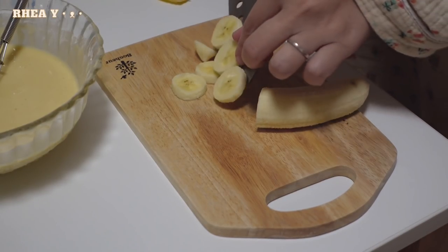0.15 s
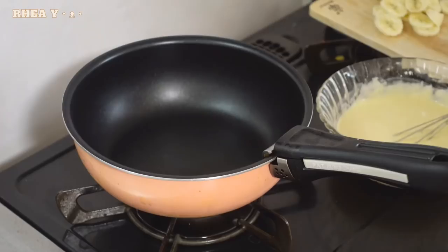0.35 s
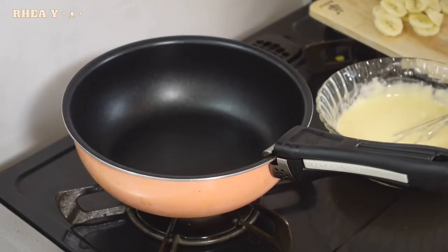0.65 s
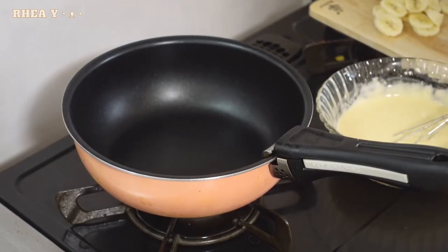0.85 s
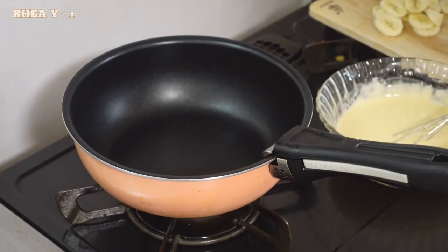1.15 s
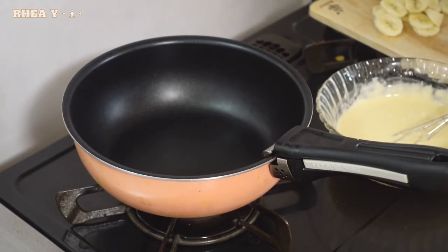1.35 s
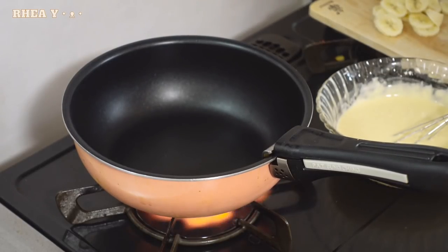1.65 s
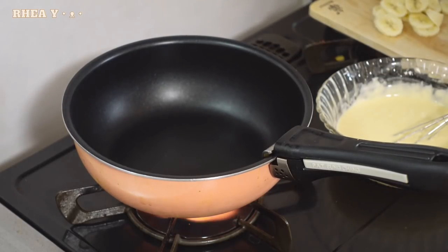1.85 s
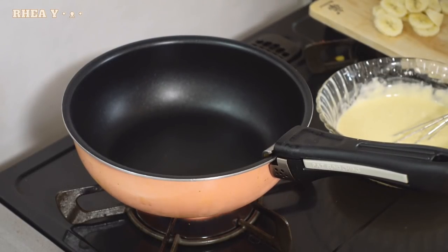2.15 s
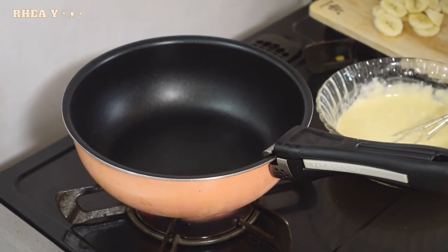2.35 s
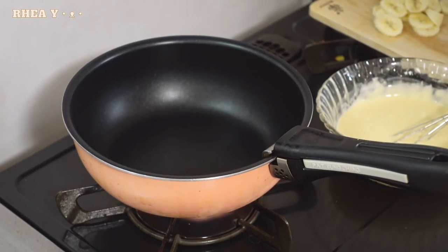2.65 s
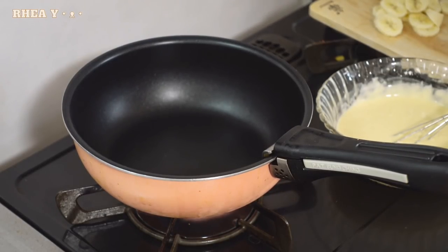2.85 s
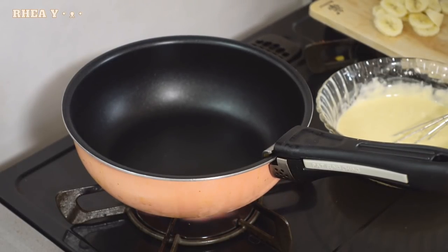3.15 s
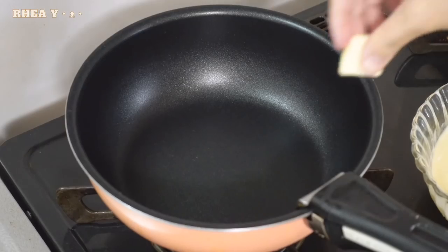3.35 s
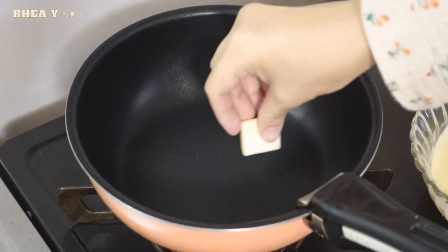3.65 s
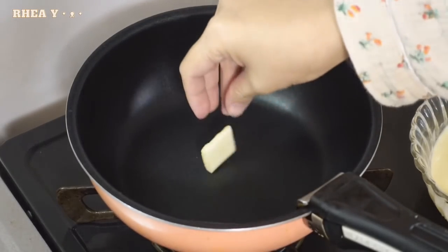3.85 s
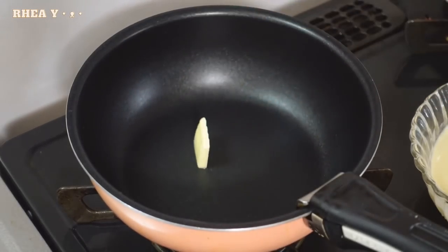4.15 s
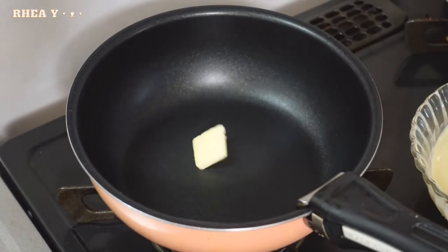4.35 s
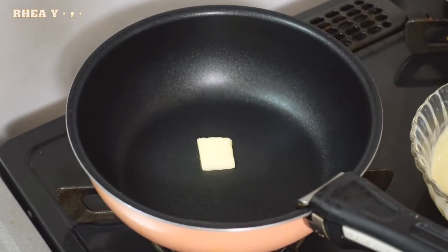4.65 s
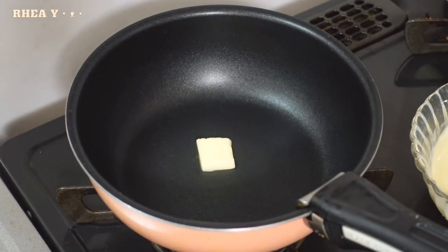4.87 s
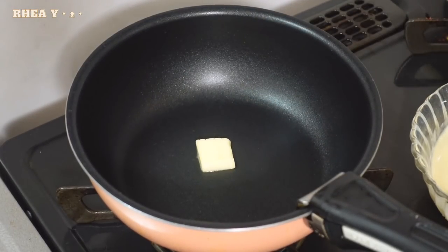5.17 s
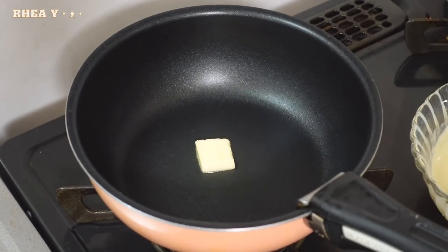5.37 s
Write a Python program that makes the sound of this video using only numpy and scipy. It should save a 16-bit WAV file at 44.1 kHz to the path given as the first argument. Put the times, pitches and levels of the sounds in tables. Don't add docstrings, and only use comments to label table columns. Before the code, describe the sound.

A brief quiet worktop hum cuts to a gas stove: dull knob knocks on sheet metal, a bright valve snap, then sharp sparks about seven a second. Gas catches with a low whump and flutters softly beneath the clicking. After a second cut, a sleeve swishes, a butter pat taps on edge and slaps flat in the pan, with tiny metal ticks and barely audible sizzle. Close microphone, small kitchen.

```python
import sys
import numpy as np
from scipy import signal
from scipy.fft import rfft, irfft, next_fast_len
from scipy.io import wavfile
from scipy.ndimage import uniform_filter1d

SR = 44100
rng = np.random.default_rng(int(sys.argv[2]) if len(sys.argv) > 2 else 0)


def field_ratio(decibels):
    return 10 ** (np.asarray(decibels, dtype=float) / 20)


def digitize_waveform(pressure):
    field = np.atleast_2d(pressure).T
    bounded = np.clip(field, -1, 1)
    quanta = np.round(bounded * 32767).astype(np.int16)
    wavfile.write(sys.argv[1], SR, quanta)


N = 242991

CUTS = [
    0.327,
    3.1625,
]

# f/Hz, spectral level/dB per Hz
WORKTOP_AIR = [(18, -12), (30, -2), (75, -2), (141, -15), (227, -6), (259, -6.5), (486, -12), (1320, -20),
               (1590, -18.5), (3770, -29.5), (10200, -34), (13300, -35), (16000, -37)]
STOVE_AIR = [(18, -45.5), (30, -27.5), (75, -6.5), (161, -5.5), (252, -17.5), (303, -8), (364, -26),
             (1100, -22.5), (1280, -23.5), (7270, -38.5), (13500, -69), (16000, -64)]
PAN_AIR = [(18, -25), (30, -21), (75, -18), (124, -10.5), (170, -16), (287, -12.5), (473, -27.5),
           (666, -19.5), (721, -25.5), (1390, -30), (1720, -28.5), (2540, -32.5), (6800, -42.5),
           (8100, -38.5), (9500, -46), (15500, -47), (15900, -65.5)]
WORKTOP_AIR_DB, STOVE_AIR_DB, PAN_AIR_DB = -63.5, -61, -56
# f/Hz, level/dB
HUM = [(212, -76.5), (1780, -76.5), (2600, -85), (4720, -83.5)]

CALM_DB = [-64.5, -65, -54]
# t/s, level/dB, hold/s
GUSTS = [(0.4, -41.5, 0.27), (.75, -47, 0.3), (1.2, -47.5, 0.033), (1.52, -42.5, 0.022), (1.7, -59, 0.23),
         (3.17, -32.5, 0.27), (3.66, -41, 0.012), (3.83, -41.5, 0.024), (4.1, -45.5, 0.17),
         (4.61, -39.5, 0.019), (4.8, -44, 0.36), (5.25, -50.5, 0.18)]
GUST_RISE_DB_S, GUST_FALL_DB_S = 106.5, 115

# t/s, peak level/dB, ring f/Hz, top f/Hz
TICKS = [(0.061, -48.5, 9400, 14000), (3.6032, -39.5, 8060, 8000), (3.6745, -36, 5440, 7000),
         (3.713, -45, 4770, 9000), (3.758, -55, 4290, 7000), (3.78, -45, 8200, 8060),
         (3.902, -34.5, 5460, 7060), (4.2828, -27.5, 8260, 11800), (4.5514, -46.5, 4000, 6950),
         (4.569, -40, 3600, 5000), (4.776, -50, 7960, 9000), (4.997, -42.5, 5930, 6500),
         (5.155, -37, 5200, 6000), (4.6927, -38.5, 8500, 15000), (4.7074, -42.5, 8700, 14100),
         (4.785, -42, 7870, 10100), (4.991, -35.5, 5300, 7040), (5.047, -42, 4770, 8000),
         (5.148, -35.5, 4400, 7000), (5.2924, -40, 4470, 7000), (5.491, -38.5, 8640, 11960)]

# t/s, level/dB, hold/s, brightness/dB
SLEEVE_MOVES = [(0.331, -65, .03, -8.5), (0.416, -58, 0.021, -9.5), (0.517, -65, 0.076, -2),
                (0.675, -55, 0.054, -15), (0.724, -71, 0.011, -23), (1.034, -57.5, 0.021, -13),
                (1.068, -75, 0.011, -13), (3.168, -61, .02, -19), (3.201, -52.5, 0.077, -8.5),
                (3.302, -58, 0.12, -4.5), (3.471, -61.5, 0.018, -0.5), (3.597, -77, 0.61, -12.5),
                (4.042, -65, 0.018, -27.5), (4.125, -75, 0.3, -18), (4.528, -66.5, 0.11, -5),
                (4.788, -78.5, 0.46, 3), (5.372, -87, 0.099, 6.5)]
MOVE_RISE_DB_S, MOVE_FALL_DB_S = 238, 134.5
# f/Hz, spectral level/dB per Hz
CLOTH_BODY = [(290, -58), (500, -6.5), (642, -7), (735, -10), (766, -9.5), (1760, -6), (2140, -8.5),
              (3600, -11), (6000, -23), (7800, -68.5), (13200, -120)]
CLOTH_SHEEN = [(3000, -5), (5000, 3), (7000, -2), (8300, 1), (10000, -10.5), (13000, -15), (15500, -22),
               (15900, -55)]
# t/s, level/dB, hold/s
SWISH = [
    (3.19, -44.5, 0.034),
    (3.3, -52, 0.092),
]
SWISH_RISE_DB_S, SWISH_FALL_DB_S = 803, 98

PUFF_DB = [-93, -71, -62]
ROAR_DB = [-83, -67, -69.5]
PUFF_LUMPS_DB, PUFF_LUMPS_PER_S = 5.5, 12
ROAR_LUMPS_DB, ROAR_LUMPS_PER_S = 3.5, 2
# t/s, level/dB, hold/s
PUFFS = [(.36, -47, 0.12), (.58, -45, 0.017), (.87, -40, 0.052), (1.75, -43.5, 0.048), (3.17, -38, 0.071),
         (3.29, -45, .03), (4.43, -46, 0.016), (5.0, -48.5, 0.68)]
ROARS = [(.33, -71, 0.014), (1.26, -61.5, 0.03), (1.75, -61.5, 0.33), (3.17, -55.5, 0.024),
         (3.9, -55.5, 0.032), (4.04, -57, 0.013), (4.43, -61, 0.04), (4.95, -66, 0.31)]
BURN_RISE_DB_S, BURN_FALL_DB_S = 202.5, 128
# t/s, level/dB, hold/s
WHUMP = [
    (1.39, -60, 0.022),
    (1.43, -41, 0.055),
    (1.5, -40.5, 0.025),
    (1.61, -40, 0.02),
]
WHUMP_RISE_DB_S, WHUMP_FALL_DB_S = 336.5, 293
# t/s, level/dB, hold/s
FLARE = [
    (1.385, -49, 0.13),
    (1.57, -47.5, 0.075),
    (1.64, -37, 0.014),
    (1.76, -58, 0.045),
]
FLARE_RISE_DB_S, FLARE_FALL_DB_S = 399.5, 353
# f/Hz, spectral level/dB per Hz
FLARE_COLOUR = [(100, -50.5), (170, -4.5), (292, -4.5), (376, -2), (1020, -1.5), (1130, -6.5), (1280, -6.5),
                (3000, -19), (3900, -58), (6600, -120)]
THUD = 1.516, -25, 145, .03
# t/s, level/dB, hold/s
DRONE = [
    (3.29, -53, 0.016),
    (3.46, -52.5, 0.35),
    (4.05, -45, 0.045),
]
DRONE_RISE_DB_S, DRONE_FALL_DB_S = 249.5, 299.5

# t/s, peak level/dB, hardness f/Hz, contact/s
KNOB = [(0.557, -31.5, 1100, 0.012), (.572, -33.5, 1100, 0.0043), (.667, -24, 800, 0.011),
        (.705, -34.5, 1500, 0.013), (.834, -31.5, 2500, 0.0091), (0.851, -26, 700, 0.00563),
        (0.867, -28, 900, 0.004), (0.927, -34, 1210, 0.0095), (1.027, -41.5, 2480, 0.02),
        (1.377, -25, 900, 0.0066), (1.517, -33, 300, 0.011), (1.607, -35, 900, 0.025),
        (1.643, -25.5, 700, 0.025), (2.016, -36, 450, 0.014), (2.191, -44, 420, 0.0236),
        (2.341, -47.5, 420, 0.024)]
# f/Hz, level/dB, t60/s
STOVE_BODY = [(220, -9.5, 0.33), (317.7, -10, 0.16), (352.4, 2.5, 0.034), (396, -7.5, 0.043),
              (605, -5, 0.048), (674, -15.5, 0.045), (930, -13.5, 0.015), (1120, -12, .05),
              (1430, -9, 0.026), (1870, -14.5, .02), (2500, -3, .02)]
# t/s, level/dB, ring f/Hz
LATCH = [(0.556, -40, 1820), (.649, -47, 3000), (0.667, -34, 2540), (0.833, -21.5, 5600), (0.835, -6, 4970),
         (.840, -18, 5400), (0.863, -12.5, 2410), (.92, -25.5, 1770), (0.925, -29.5, 4900),
         (1.027, -44, 2520), (1.064, -36.5, 5100)]

# t/s, and the peak level/dB of each
SPARK_S = [1.1202, 1.263, 1.405, 1.5476, 1.6902, 1.8329, 1.9754, 2.1178, 2.2601, 2.4025, 2.5449, 2.687,
           2.8283]
SPARK_DB = [-2.5, -0.5, 1, -3, -4.5, -5.5, -5.5, -6.5, -6, -6.5, -7, -8.5, -8.5]
# f/Hz, spectral level/dB per Hz
SPARK_COLOUR = [(410, -47.5), (640, -9), (1190, -2.5), (1600, 2.5), (2110, 5.5), (2790, 2), (3070, 3),
                (4000, 3), (5890, 2.5), (8540, 8), (9250, 3), (13400, 5.5), (15400, 0.5), (16100, -12),
                (16900, -51.5)]
# delay/ms, signed strength
BOUNCES = [(0, -.27), (.59, -.38), (.74, -1.0), (.82, .4), (.95, .27), (1.27, -1.0), (1.34, .56),
           (1.43, -.55), (1.59, -.36), (1.765, -1.1), (1.86, .31), (1.95, -.26), (2.15, .33), (2.22, .4),
           (2.52, -.48), (3.22, -.25), (4.74, -.24), (5.76, .25)]
BOUNCE_DB = -0.4
CAP_COLD_DB, CAP_LIT_DB, CAP_SETTLES = -5.9, -19.5, 2

# t/s, level/dB, hardness f/Hz, 0 on edge or 1 flat, slap level/dB
TOUCHES = [
    (3.831, -13, 930, 0, -14.5),
    (3.8341, -8, 990, 0, -19),
    (3.8385, -14, 990, 0, -16.5),
    (4.028, -47, 2990, 0, -27),
    (4.395, -10.5, 4440, 1, -10.5),
    (4.3965, -30, 3020, 1, -23),
]
# f/Hz, level on edge/dB, level flat/dB, t60/s
PAN = [(182, -15, -41, 0.42), (238, -25.5, -21.5, 0.32), (410, -25, -27, 0.3), (674, -25.5, -27, 1),
       (676, -35, 6, 0.026), (777, -27, 11, 0.05), (732, -41, -1.5, 0.038), (597.6, -15.5, -23, 0.35),
       (938, -31.5, -4, 0.073), (1266, 5, 3, 0.04), (1384, 4, 13, 0.027), (1310, -21, -10.5, 0.2),
       (1402, -18, -5.5, 0.066), (1690, 2.5, 6, 0.013), (1957, -0.5, -11, 0.071), (2160, -36, -2, 0.06),
       (358, -27, -40.5, 0.27), (3220, -24, 0, 0.014), (3810, -48.5, -12, .04), (2540, -8.5, -6, 0.029),
       (5200, -27, -6.5, 0.031), (8200, -40, 4, 0.0097)]
# f/Hz, level/dB, t60/s
PAN_FLOOR = [(1341, -25, .09), (634, -16.5, .076), (664, -13.5, .095), (718, -11.5, .051), (745, -18, .13),
             (792, .3, .027), (759, -9.5, .1), (945, -20, .1), (777, -9, .115), (1063, .1, .014),
             (908, -1, .01), (1291, -28, .11), (1072, -5.5, .027)]
EDGE_S, EDGE_DB = 3.8299, 0.5

# t/s, level/dB, hold/s
SIZZLE = [
    (4.78, -72, 0.089),
    (5.05, -77.5, 0.18),
    (5.36, -66, 0.09),
]

# f/Hz, t60/s
KITCHEN_T60 = [(300, 0.77), (1300, 0.2), (3500, 0.28), (9000, 0.23), (13000, 0.14), (16500, 0.1)]


def rms_one(x):
    return x / np.sqrt(np.mean(x ** 2) + 1e-20)


def at_hz(points, hz):
    table = np.array(points)
    return np.interp(np.log(hz), np.log(table[:, 0]), table[:, 1])


def add(out, s, sound):
    part = out[round(s * SR):][:len(sound)]
    part += sound[:len(part)]


def above(x, hz):
    return signal.sosfilt(signal.butter(2, hz, "high", fs=SR, output="sos"), x)


def steeply_above(x, hz):
    return above(above(x, hz), hz)


def below(x, hz, order=2):
    return signal.sosfilt(signal.butter(order, hz, fs=SR, output="sos"), x)


def through(x, response):
    return signal.fftconvolve(x, response)[:N]


def drift(rate):
    pole = np.exp(-80 * np.pi * rate / SR)
    steps = rng.standard_normal(N // 40 + 2002)
    slow = signal.lfilter([1], [1, -2 * pole, pole * pole], steps)[2000:]
    return np.interp(np.arange(N) / 40, np.arange(len(slow)), rms_one(slow))


def noise(spectrum, patchy_db, rate):
    long = next_fast_len(N, True)
    hz = np.fft.rfftfreq(long, 1 / SR) + 1
    bins = rfft(rng.standard_normal(long)) * field_ratio(at_hz(spectrum, hz))
    shared = drift(rate)
    octave = np.maximum(np.log2(hz), 4)
    out = 0
    for centre in range(4, 15, 2):
        share = np.clip(1 - abs(octave - centre) / 2, 0, 1)
        flicker = .7 * shared + .7 * drift(rate)
        out = out + irfft(bins * share, long)[:N] * field_ratio(patchy_db * flicker)
    return rms_one(out)


def ring(clicks, hz, t60):
    r, w = field_ratio(-60 / (t60 * SR)), 2 * np.pi * hz / SR
    return signal.lfilter([0, np.sin(w)], [1, -2 * r * np.cos(w), r * r], clicks + 1e-18)


def blow(s, db, hz, rubbing=0.):
    force = np.zeros(N)
    long = round(rubbing * SR) + 1
    grit = rng.standard_normal(2000)[:long] / np.sqrt(long)
    add(force, s, .3 * grit * (rubbing > 0))
    add(force, s + rubbing / 3, np.ones(1))
    return field_ratio(db) * below(force + 1e-18, hz)


def puff(db, hz, t60):
    t = np.arange(5000) / SR
    burst = below(rng.standard_normal(len(t)), min(hz, 18000))
    return field_ratio(db - 60 * t / t60) * (1 - np.exp(-40 * t / t60)) * burst


def kitchen(onset_s):
    t = np.arange(SR // 3) / SR
    edges = [100, 250, 600, 1200, 2200, 3800, 6000, 8500, 11000, 13500, 15500, 18000]
    out = 0
    for low, high in zip(edges, edges[1:]):
        sos = signal.butter(2, [low, high], "band", fs=SR, output="sos")
        band = signal.sosfilt(sos, rng.standard_normal(len(t)))
        out = out + band * field_ratio(-60 * t / at_hz(KITCHEN_T60, np.sqrt(low * high)))
    out = out * (1 - np.exp(-t / onset_s))
    return out / np.sqrt(np.sum(out ** 2))


def per_shot(values):
    return np.choose(np.searchsorted(CUTS, np.arange(N) / SR), values)


def swells(rows, rise_db_s, fall_db_s):
    t = np.arange(0, N + 32, 32) / SR
    s, db, hold = (np.array(rows)[:, [k]] for k in range(3))
    early = np.maximum(s - t, 0)
    late = np.maximum(t - s - np.abs(hold), 0)
    gains = field_ratio(db - rise_db_s * early - fall_db_s * late)
    same_shot = np.searchsorted(CUTS, t) == np.searchsorted(CUTS, s)
    return np.repeat(gains * same_shot, 32, axis=1)[:, :N]


def together(gains):
    return uniform_filter1d(np.sqrt(np.sum(gains ** 2, axis=0)), size=32)


def room_tone():
    whine = sum(field_ratio(db) * rms_one(ring(rng.standard_normal(N), hz, 0.17)) for hz, db in HUM)
    worktop = field_ratio(WORKTOP_AIR_DB) * noise(WORKTOP_AIR, 0.36, 6.8) + whine
    stove = field_ratio(STOVE_AIR_DB) * noise(STOVE_AIR, 0.87, 1.9)
    pan = field_ratio(PAN_AIR_DB) * noise(PAN_AIR, 0.27, 15)
    return per_shot([worktop, stove, pan])


def draught():
    swing = np.sqrt(2) * np.sin(2 * np.pi * np.cumsum(13 + 1.5 * drift(1.0)) / SR)
    rumble = noise([(8, -3), (18, 20.5), (30, 16.5), (50, 6.0), (80, -48.5)], 3.5, 3.4)
    gusts = together(swells(GUSTS, GUST_RISE_DB_S, GUST_FALL_DB_S))
    return np.hypot(field_ratio(per_shot(CALM_DB)), gusts) * (swing + field_ratio(-12.5) * rumble)


def ticks():
    out = np.zeros(N)
    for s, db, hz, top_hz in TICKS:
        spit = below(puff(db - 3, top_hz, 0.018), 1.2 * top_hz, order=4)
        add(out, s, .1 * ring(spit, hz, .002) + .08 * ring(spit, .68 * hz, .002) + spit)
    return steeply_above(out, 3600)


def sleeve():
    body, sheen = noise(CLOTH_BODY, 1.8, 30), noise(CLOTH_SHEEN, .7, 30)
    moves = field_ratio(7) * swells(SLEEVE_MOVES, MOVE_RISE_DB_S, MOVE_FALL_DB_S)
    brightness = field_ratio(np.array(SLEEVE_MOVES)[:, [3]])
    moving = together(moves) * body + together(moves * brightness) * sheen
    rush = noise([(700, -40), (1100, 6.5), (1800, 8.0), (2300, 4), (3600, 3.0), (5000, -18)], 0.53, 27)
    return moving + together(swells(SWISH, SWISH_RISE_DB_S, SWISH_FALL_DB_S)) * rush


def gas():
    low = noise([(25, -30), (50, -3), (110, 0), (170, -6), (250, -30)], 2.0, 20)
    roar = noise([(130, -30), (200, 0), (310, 0), (480, -8), (800, -30)], 2.5, 25)
    drone = rms_one(ring(rng.standard_normal(N), 104.0, 0.26))
    boom = noise([(30, -33.5), (60, 7.0), (120, 6.5), (220, -6.0), (330, -3.0), (600, -29.0)], 0.67, 30)
    crackle = noise(FLARE_COLOUR, 4.4, 30)

    mean_puffing = field_ratio(per_shot(PUFF_DB) + PUFF_LUMPS_DB * drift(PUFF_LUMPS_PER_S))
    mean_roaring = field_ratio(per_shot(ROAR_DB) + ROAR_LUMPS_DB * drift(ROAR_LUMPS_PER_S))
    puffing = np.hypot(mean_puffing, together(swells(PUFFS, BURN_RISE_DB_S, BURN_FALL_DB_S)))
    roaring = np.hypot(mean_roaring, together(swells(ROARS, BURN_RISE_DB_S, BURN_FALL_DB_S)))
    burning = field_ratio(-11.5) * puffing * low + roaring * roar

    whump = together(swells(WHUMP, WHUMP_RISE_DB_S, WHUMP_FALL_DB_S)) * boom
    flare = together(swells(FLARE, FLARE_RISE_DB_S, FLARE_FALL_DB_S)) * crackle
    droning = together(swells(DRONE, DRONE_RISE_DB_S, DRONE_FALL_DB_S)) * drone
    thud_s, thud_db, thud_hz, thud_t60 = THUD
    thud = ring(blow(thud_s, thud_db, 400), thud_hz, thud_t60)
    return burning + whump + thud + flare + droning


def knob():
    forces = np.array([blow(s, db, hz, rubbing) for s, db, hz, rubbing in KNOB])
    shares = field_ratio(rng.normal(0, 1.5, (len(KNOB), len(STOVE_BODY))))
    out = np.zeros(N)
    for k, (hz, db, t60) in enumerate(STOVE_BODY):
        damped_t60 = min(t60, .14 * (312 / hz) + .012)
        out += (-1) ** k * field_ratio(db) * ring(shares[:, k] @ forces, hz, damped_t60)
    for s, db, hz, rubbing in KNOB:
        add(out, s, puff(db + 5.5, 990, 0.14))
    for s, db, hz in LATCH:
        rattle = puff(db, 0.97 * hz, 0.027)
        hard_db = db - 30 * np.log10(max(4600 / hz, 1))
        fizz = above(puff(hard_db - 18, 9000, 0.027), 6000)
        fizz += ring(puff(hard_db - 25.0, 18000, 0.034), 13000, 0.0017)
        fizz += ring(puff(hard_db - 22.0, 9700, 0.14), 5100, 0.0016)
        add(out, s, 0.093 * ring(rattle, hz, 0.01) + above(rattle, 0.76 * hz) + fizz)
    return steeply_above(out, 190)


def squeak():
    out = np.zeros(N)
    add(out, .739, .1 * ring(puff(-33, 4000, .03), 2680, .012))
    return out


def igniter():
    shared, out = kitchen(0.0012), np.zeros(N)
    cap = signal.butter(2, [5000, 7600], "band", fs=SR, output="sos")
    gap = signal.butter(1, [3500, 4500], "band", fs=SR, output="sos")
    for k, (s, db) in enumerate(zip(SPARK_S, SPARK_DB)):
        cap_db = CAP_LIT_DB + (CAP_COLD_DB - CAP_LIT_DB) * np.exp(-k / CAP_SETTLES)
        paths = shared + 0.17 * kitchen(0.0015)
        paths[:400] += field_ratio(-26) * rng.standard_normal(400) * np.exp(-np.arange(400) / 200)
        for (ms, strength), wander in zip(BOUNCES, rng.normal(1, .18, len(BOUNCES))):
            paths[round(ms * SR / 1000)] += field_ratio(BOUNCE_DB) * .75 * strength * wander
        if k < 3:
            paths -= .7 * signal.sosfilt(gap, paths)
        add(out, s, field_ratio(db + 1.0) * (paths + field_ratio(cap_db) * signal.sosfilt(cap, paths)))
    power = field_ratio(2 * at_hz(SPARK_COLOUR, np.linspace(1, SR / 2, 200))) + 1e-7
    colour = signal.minimum_phase(signal.firwin2(511, np.linspace(0, 1, 200), power))
    return through(out, colour)


def butter_pat():
    on_edge, on_flat = [sum(blow(s, db - 10.5, hz) for s, db, hz, flat, _ in TOUCHES if round(flat) == way)
                        for way in (0, 1)]
    out = np.zeros(N)
    for k, (hz, edge_db, flat_db, t60) in enumerate(PAN):
        force = field_ratio(edge_db) * on_edge + field_ratio(flat_db) * on_flat
        out += (-1) ** k * ring(force, hz, t60)
    edge = blow(EDGE_S, EDGE_DB, 9000)
    for k, (hz, db, t60) in enumerate(PAN_FLOOR):
        out += (-1) ** k * field_ratio(db) * ring(edge, hz, t60)
    for s, db, hz, flat, slap_db in TOUCHES:
        add(out, s, puff(slap_db, 0.59 * hz, 0.022) + above(puff(slap_db - 17.5, 4200, 0.09), 1300))
    out -= field_ratio(-4) * above(blow(4.3954, 10, 3600), 1000)
    return steeply_above(out, 140)


def sizzle():
    spitting = noise([(5000, -21), (8000, 4), (9000, 3.0), (10500, -4), (14000, 1), (15700, -4), (16000, -40.5)],
                     2.5, 40)
    whine = field_ratio(per_shot([-120, -120, -76])) * rms_one(ring(rng.standard_normal(N), 2620, 0.077))
    return together(swells(SIZZLE, 148, 120)) * spitting + whine


def scene():
    room = kitchen(0.0015)
    struck = [(knob(), -10), (squeak(), -20), (butter_pat(), -16), (ticks(), -9)]   # (source, room dB)
    heard = sum(x + field_ratio(wet_db) * through(x, room) for x, wet_db in struck)
    return (heard + igniter() + room_tone() + draught() + sleeve() + gas() + sizzle())[None]


def low_pass(x):
    return signal.sosfilt(signal.butter(12, 16990, fs=SR, output="sos"), x)


def record(dry):
    rounded = .9 * np.tanh(dry / .9)
    mix = signal.sosfilt(signal.cheby2(10, 60, 16900, fs=SR, output="sos"), rounded)
    return low_pass(mix)


dry = scene()
out = record(dry)
digitize_waveform(out)
```